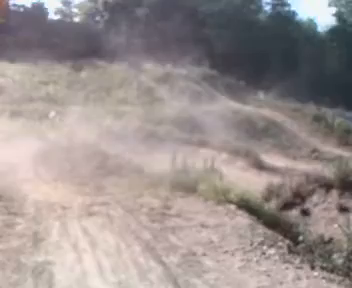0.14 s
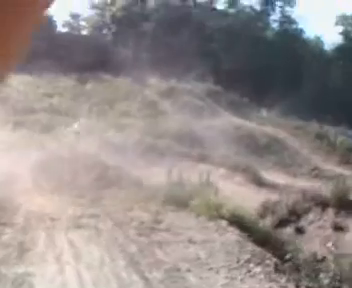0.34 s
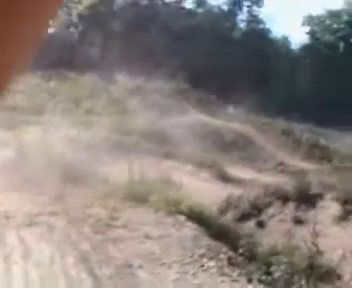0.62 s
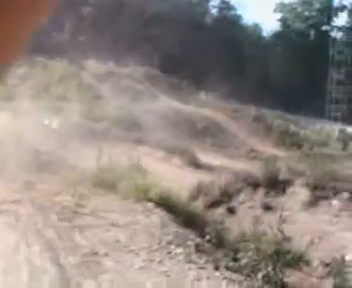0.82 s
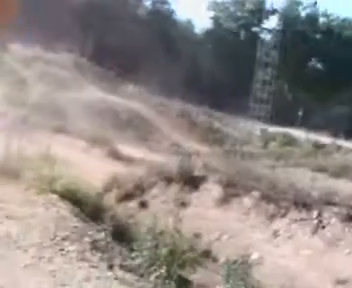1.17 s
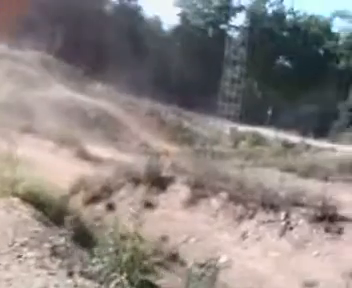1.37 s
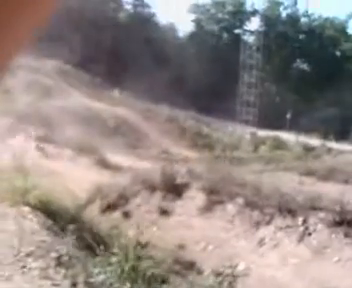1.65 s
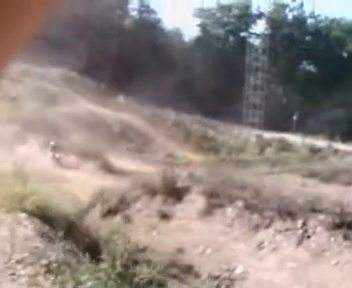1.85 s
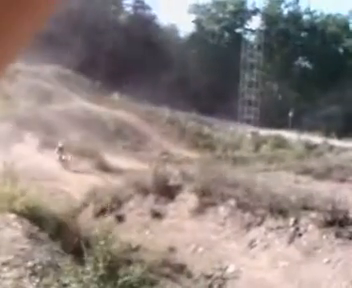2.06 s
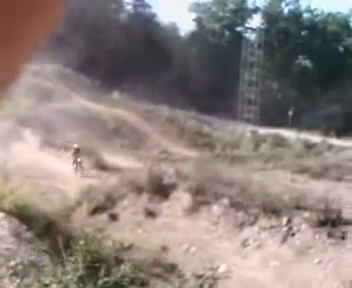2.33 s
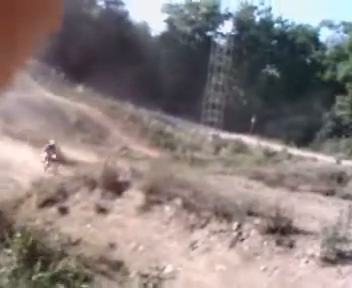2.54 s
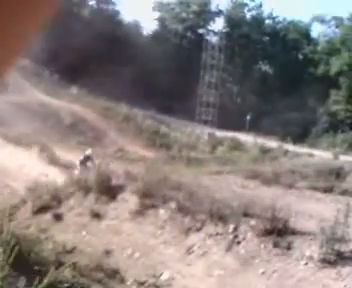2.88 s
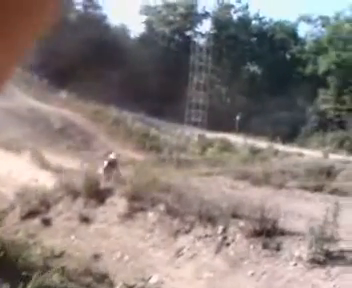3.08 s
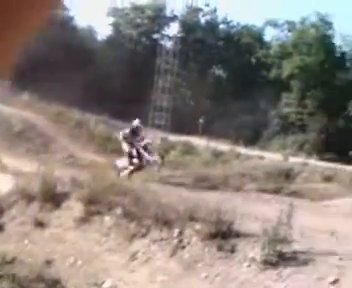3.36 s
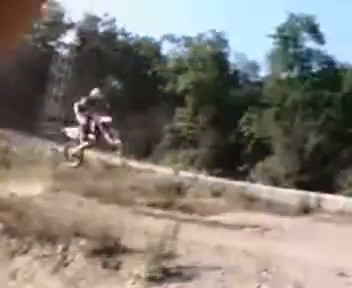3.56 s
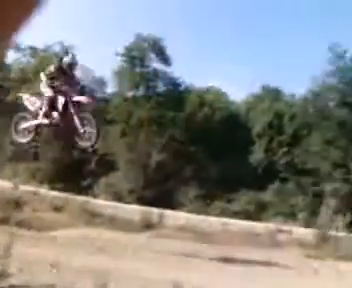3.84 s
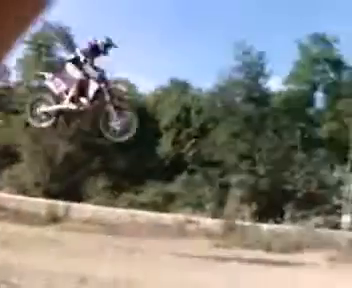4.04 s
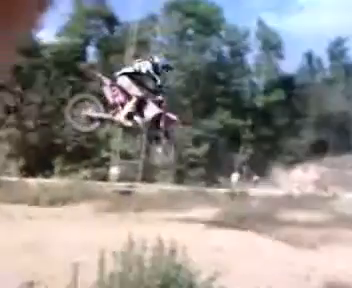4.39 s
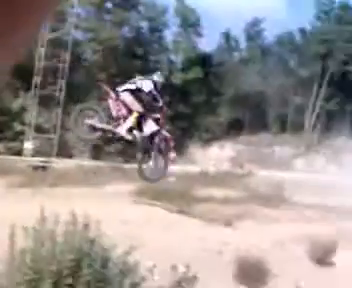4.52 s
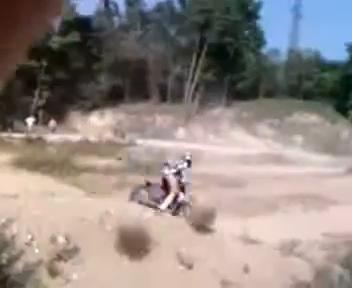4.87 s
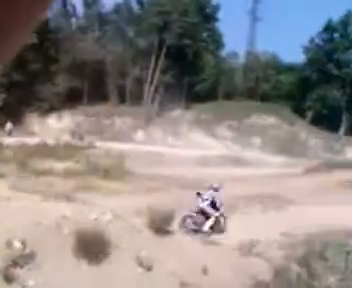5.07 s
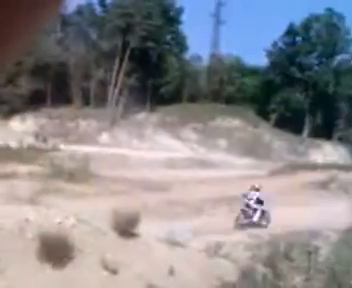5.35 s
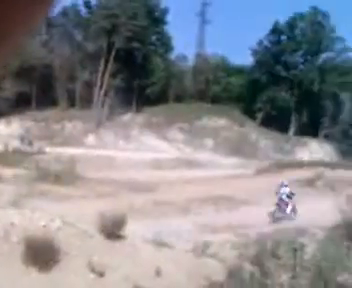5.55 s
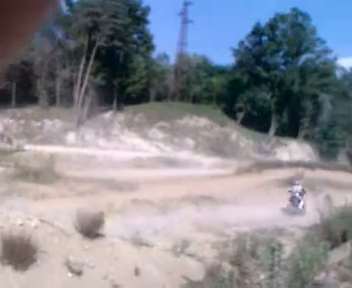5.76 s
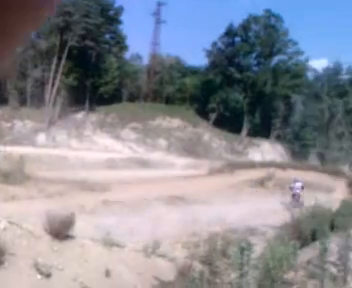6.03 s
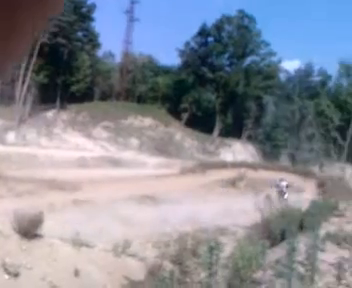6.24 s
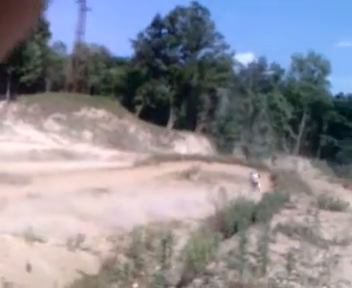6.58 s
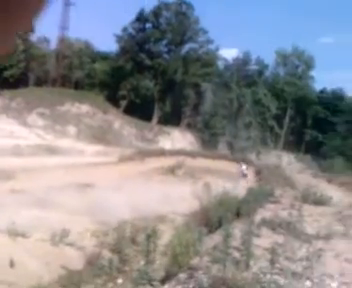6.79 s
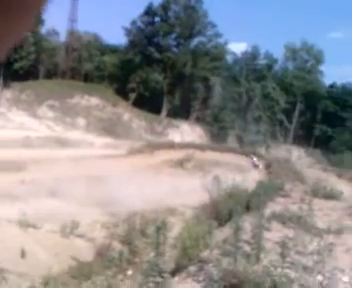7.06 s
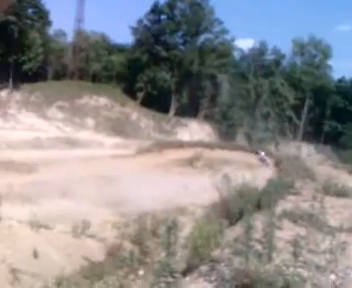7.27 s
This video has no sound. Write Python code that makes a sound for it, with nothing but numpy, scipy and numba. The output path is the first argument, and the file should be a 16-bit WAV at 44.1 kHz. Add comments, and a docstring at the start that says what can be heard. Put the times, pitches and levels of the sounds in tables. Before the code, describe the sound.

Outdoors in a dirt bowl, a harsh, buzzing two-stroke engine approaches in uneven throttle pulls, its pitch climbing steadily before cutting back. It is loudest mid-way, close and crackling, slightly overloading the cheap microphone, then screams briefly and rides off with fading pops and buzz. Faint hiss and low wind lie underneath; handling squeaks and dull knocks come from the recorder's plastic case.

```python
"""In a sandy bowl, a two-stroke dirt bike climbs, takes a jump near a small hand-held recorder and rides away.
Firings boom in the expansion chamber and bark from the silencer, gas and fins rasp; the banks echo it.
Clicks at the firing rate and gas noise pass through moving resonances; two sines carry the low boom.
The plastic case squeaks and knocks under the hand as ringing modes; noise makes the wind and far hiss.
The narrow-band recorder cuts the top of the treble and clips the peaks."""
import sys
import numpy as np
from scipy import signal
from scipy.fft import rfft, irfft, next_fast_len
from scipy.io import wavfile
from scipy.ndimage import uniform_filter1d
from numba import njit

SR = 44100
rng = np.random.default_rng(int(sys.argv[2]) if len(sys.argv) > 2 else 0)


def dump_mix(stems):
    """Bounce the given channels to the path in sys.argv[1] as a 16-bit WAV at rate SR."""
    frames = np.atleast_2d(stems).T  # one column per channel
    limited = np.clip(frames, -1, 1)  # hard clip at full scale
    pcm = np.round(limited * 32767).astype(np.int16)
    wavfile.write(sys.argv[1], SR, pcm)


def how_loud(loudness_db):
    """Turn decibels into a plain amplitude multiplier (0 dB gives 1, 20 dB gives 10)."""
    steps = np.asarray(loudness_db, float) / 20
    return 10 ** steps


N = 326781
T = np.arange(N) / SR


def level(x, db):
    """Scale to an rms level."""
    return x * how_loud(db) / np.sqrt(np.mean(x ** 2))


def curve(rows):
    """Columns of a table against time, one value a sample."""
    s, *columns = np.transpose(rows)
    return [np.interp(T, s, c) for c in columns]


def log_interp(hz, points):
    """Read a response of (Hz, dB) points along a logarithmic frequency axis."""
    point_hz, db = np.transpose(points)
    return np.interp(np.log(hz), np.log(point_hz), db)


def band(x, lo_hz, hi_hz, order=3):
    """Steep band-pass."""
    return signal.sosfilt(signal.butter(order, [lo_hz, hi_hz], "band", fs=SR, output="sos"), x)


def colour(x, points, sweep_ms=0.):
    """Impose a spectrum of (Hz, dB) points; each kHz may come sweep_ms later than the one below."""
    size = next_fast_len(N)
    f = np.maximum(np.arange(size // 2 + 1) * SR / size, 1)
    delay = np.exp(-1j * np.pi * sweep_ms * (f / 1000) ** 2)
    return irfft(rfft(x, size) * delay * how_loud(log_interp(f, points)), size)[:N]


def steady(x, hold_s):
    """Divide out the running rms, so that only the level curve sets the loudness."""
    return x / np.sqrt(uniform_filter1d(x ** 2, int(hold_s * SR)) + 1e-12)


def walk(rate):
    """Random levels held 1 / rate s and slewed twice; spread near 1."""
    k = int(SR / rate)
    held = np.repeat(rng.standard_normal(N // k + 1), k)
    return 1.3 * uniform_filter1d(uniform_filter1d(held, k), k)[:N]


def lag(x, tau_s):
    """Follow x with a time constant."""
    keep = np.exp(-1 / (tau_s * SR))
    return signal.lfilter([1 - keep], [1, -keep], x)


@njit
def svf(x, hz, width):
    """State-variable band-pass whose centre may move, gain 1 at the centre."""
    y, b, l = np.empty(len(x)), 0., 0.
    for i in range(len(x)):
        g, k = np.tan(np.pi * hz[i] / SR), width / hz[i]
        v = (b + g * (x[i] - l)) / (1 + g * (g + k))
        b, l, y[i] = 2 * v - b, l + 2 * g * v, k * v
    return y


def resonance(x, hz, width_hz):
    """Ring x at a fixed or moving frequency."""
    return svf(x, np.full(N, 1. * hz), 1. * width_hz)


def clicks(turns, size_db, late):
    """One click at each whole turn, shared between two samples; each has its own size and lateness (turns)."""
    whole = np.arange(1, int(turns[-1]))
    at = np.interp(whole + late[:len(whole)], turns, np.arange(N))
    before, size = at.astype(int), how_loud(size_db[:len(whole)])
    share = at - before
    return (np.bincount(before, size * (1 - share), N + 1) + np.bincount(before + 1, size * share, N + 1))[:N]


def crank():
    """Firing rate (Hz): the rear wheel skips over bumps and the revs flare; rough ground shakes them."""
    # crank speed without the wheelspin: t/s, firing rate f/Hz
    revs = [(0.0, 111.5), (0.331, 95.7), (0.348, 91.5), (0.453, 128.6), (0.493, 135.3), (0.737, 119),
            (0.906, 113.4), (1.004, 117.8), (1.12, 96.3), (1.207, 99.7), (1.3, 118.8), (1.44, 120.9),
            (1.49, 141.2), (1.54, 143.4), (1.625, 140.8), (1.73, 135.1), (1.869, 132.8), (1.968, 139.5),
            (2.101, 149.9), (2.194, 159.6), (2.368, 185), (2.548, 201), (2.79, 204.8), (2.868, 212.1),
            (2.914, 164.9), (2.949, 145.5), (3.036, 171.5), (3.106, 167.5), (3.239, 179.4), (3.338, 148.7),
            (3.518, 133.3), (3.698, 124), (3.762, 125.1), (3.905, 186.3), (4.005, 172.9), (4.296, 154.9),
            (4.574, 136.4), (4.743, 206.6), (4.83, 222.6), (4.905, 234), (4.925, 224.4), (4.957, 194.5),
            (4.985, 187.3), (5.143, 166.1), (5.24, 162.1), (5.37, 174), (5.451, 188.5), (5.492, 187.7),
            (5.666, 165.2), (5.764, 141.7), (5.968, 133.8), (6.101, 119.9), (6.16, 122), (6.287, 103.8),
            (6.374, 139.2), (6.502, 134.3), (6.687, 106.4), (6.978, 89), (7.338, 75), (7.407, 79.4)]
    # wheelspin flares: t/s of the peak, rise f/Hz
    slips = [(0.938, 7.9), (1.801, 10.7), (2.029, 11.8), (2.143, 10.6), (2.242, 6.4), (2.493, 15.5),
             (2.611, 21), (2.725, 27), (2.832, 6.85)]
    half_s, waver = .055, .0035  # half length of a flare (s), share of the revs
    flares = sum(hz * np.cos(np.pi / 2 * np.clip((T - s) / half_s, -1, 1)) ** 2 for s, hz in slips)
    return (curve(revs)[0] + flares) * (1 + waver * walk(30))


def throttle():
    """How far it is open (0-1), and what that adds to bark and boom (dB)."""
    # pulls: open t/s, shut t/s, bark gain/dB at first, at last, boom gain/dB at first, at last
    pulls = [(-0.1, 0.103, 0, 3.8, 15, 9), (0.35, 0.479, 2, 5.8, 12.5, 3.4),
             (0.951, 1.008, 5, 2.9, -5, 0.93), (1.117, 1.313, -4.5, 7.8, 3.5, 4.5),
             (1.426, 2.815, 7.5, 12.2, 12, 9.6), (2.777, 2.875, 4.5, 6.2, -2, 2.6),
             (2.953, 3.24, 8.5, 7.4, 3.5, 5.5), (3.766, 3.887, 12.5, 9.1, 4, 8.4),
             (4.591, 4.771, 13, 13.5, 6, 8.15), (4.754, 4.934, 9.5, 4.3, 3, 2.6),
             (4.934, 5.138, 9, 4.8, 7, 6.9), (5.137, 5.513, 5.5, 14.7, 8.5, 15.4),
             (6.094, 6.094, 9, 5.1, 6, 4.6), (6.305, 6.429, 3, 6.2, 6, 1.65)]
    open_s, shut_s, boom_open_s, boom_shut_s = 0.027, 0.035, 0.0017, 0.035
    opened, bark_db, boom_db = np.zeros((3, N))
    for start, end, bark_first, bark_last, boom_first, boom_last in pulls:
        ramp = lambda up_s, down_s: np.clip(np.minimum((T - start) / up_s, (end + down_s - T) / down_s), 0, 1)
        drift = lambda first, last: np.interp(T, [start + open_s, max(end, start + open_s)], [first, last])
        opened = np.maximum(opened, ramp(open_s, shut_s))
        bark_db = np.maximum(bark_db, ramp(open_s, shut_s) * drift(bark_first, bark_last))
        boom_db = np.maximum(boom_db, ramp(boom_open_s, boom_shut_s) * drift(boom_first, boom_last))
    # after a long pull the shut engine falls under its coasting level for a moment
    choke_db = -1 * (1 - opened) * lag(opened, 0.14) ** 2
    return opened, bark_db + choke_db, boom_db + choke_db


def banks(x, wet):
    """Ground and earth banks return the sound; the paths drift as the bike moves."""
    # echoes: mean delay t/ms, level/dB at wet = 1
    echoes = [(2.1, -7), (3.7, -6), (7.3, -6), (19, -11), (47, -16)]
    return x + wet * sum(how_loud(db) * np.interp(T - ms / 1000 * (1 + .12 * walk(1.5)), T, x) for ms, db in echoes)


def exhaust_pipe(firings, gas, rough):
    """Firings and gas noise, with their echoes, coloured by the exhaust and its standing waves."""
    # exhaust spectrum: f/Hz, level/dB per Hz
    spectrum = [(250, 20), (420, -1), (492, -13), (692, -3), (791, -6.5), (985, -2.5), (1130, -3),
                (1450, -1), (2310, -8), (2740, -11), (2980, -13.5), (4680, -22.5), (5410, -16.5),
                (6990, -12), (7700, -17), (10000, -79), (16900, -120)]
    # standing waves of the tail pipe: f/Hz, width f/Hz, level/dB
    waves = [(705, 80, 3), (1430, 110, -3), (2250, 200, -5)]
    puff = colour(gas, [(400, -5), (2500, 3)])  # turbulence blurs the high orders first
    hiss = level(band(gas, 3100, 9000, order=2), -5)
    wet = np.minimum(np.sqrt(rough / .14), 1)  # the clean close run drowns the echoes
    source = np.sqrt(1 - rough) * firings + np.sqrt(rough) * puff + hiss
    # each pulse leaves the silencer drawn out into a short rising sweep
    pipe = colour(banks(source, wet), spectrum, sweep_ms=2.2)
    return pipe + sum(how_loud(db) * resonance(pipe, hz, width) for hz, width, db in waves)


def low_orders(turns, first_db, second_db, patchy_db):
    """The two lowest orders of the firing rate stay clean; with the throttle shut they drop out in patches."""
    first_db = first_db + 1.6 * walk(18) - patchy_db * np.abs(walk(14))
    second_db = second_db + 2.2 * walk(18) - patchy_db * np.abs(walk(14))
    first = how_loud(first_db) * np.sin(2 * np.pi * turns - .4)
    second = how_loud(second_db) * np.sin(4 * np.pi * turns - .9)
    return np.sqrt(2) * (first + second)


def silencer_bark(pipe, bark_hz, snarl_db, upper_hz, upper_db):
    """Mid band of the pipe with its upper snarl mixed in, inverted; it rings at two moving centres."""
    bark = band(pipe, 1430, 3640) - how_loud(snarl_db) * band(pipe, 2560, 3963)
    bark = bark + how_loud(8.5) * resonance(bark, bark_hz, 600)
    return bark + how_loud(upper_db) * resonance(band(pipe, 1050, 4000), upper_hz, 260)


def expansion_chamber(pipe, chamber_hz, ring_db):
    """Low-mid band of the pipe with the chamber's moving ring."""
    chamber = band(pipe, 410, 1090)
    return chamber + how_loud(ring_db) * resonance(chamber, chamber_hz, 120)


def fin_rasp(pipe):
    """High band of gas and firings, in which the cooling fins ring on and off."""
    # fins: f/Hz, width f/Hz, level/dB before the wander
    fins = [(5500, 200, -15), (7150, 360, -13.5)]
    rasp = band(pipe, 3510, 6870)
    return rasp + sum(how_loud(db + 11.6 * walk(8)) * resonance(rasp, hz, width) for hz, width, db in fins)


def bare_crack(firings, bark_hz, upper_hz, upper_db):
    """Each firing arrives bare, and again off the ground; the crack rings at two moving centres side by side."""
    # crack spectrum: f/Hz, level/dB per Hz
    spectrum = [(250, -38), (420, -8.5), (680, 3.5), (1340, 0), (2050, -8.5), (3000, -7.5), (4850, -16.5),
                (7400, -13), (9000, -62)]
    ground_s = 3.3 / 1000 * (1 + 0.068 * walk(6))
    crack = -colour(firings + how_loud(-9.5) * np.interp(T - ground_s, T, firings), spectrum)
    bark_ring = how_loud(3.0) * resonance(crack, bark_hz, 220)
    upper_ring = how_loud(upper_db) * resonance(crack, upper_hz, 220)
    return crack + bark_ring + upper_ring


def bike():
    """Uneven firings drive the pipe and a puff of gas follows each; distance and throttle set the levels."""
    # distance and heading, throttle shut: t/s, bark level/dB, boom level/dB,
    # then added: second order level/dB, chamber level/dB, rasp level/dB
    ride = [(0.0, -27.5, -39.5, 0.5, -10.5, -5), (0.3, -34.5, -36, -11.5, -8, -10),
            (0.45, -28, -37.5, 1.5, -6.5, -9), (0.6, -29.5, -28, 1, -9, -10.5),
            (1.1, -29, -38.5, -2, -11, -8.5), (1.25, -29, -37, 2, -2, -8), (1.4, -30, -34.5, -2, -9, -10.5),
            (1.6, -29, -40.5, -4, -3, -4), (1.82, -25, -33, -8, -8, -8),
            (2.35, -25, -33.5, -9.5, -13, -4.5), (2.85, -27, -30, -8, -12.5, -2),
            (3.2, -31.5, -29.5, -7, -2.5, -12.5), (3.45, -25.5, -27, -10, -10.5, -3),
            (3.75, -24, -33.5, 7.5, -5.5, -7.5), (4.0, -21.5, -33.5, 3, -8, -3),
            (4.3, -21.5, -28, -16, -6, -5.5), (4.57, -25, -36, 10.5, -6, -7),
            (4.93, -29, -31, 6.5, 3.5, -5.5), (5.2, -35.5, -34, -5.5, 6, -3.5),
            (5.5, -32.5, -43, 1.5, -6, -12.5), (5.56, -35.5, -44.5, 7.5, -9, -4.5),
            (5.9, -45.5, -43, -8, -6, -6), (6.1, -49.5, -41.5, -2.5, -6.5, -3),
            (6.25, -54, -46, -9, -10, -2), (6.36, -48, -42.5, 1, -3.5, -7),
            (6.55, -50.5, -40, -3, -15.5, -2.5), (7.0, -67, -46, -29.5, -11, 4),
            (7.41, -62, -48, 1.5, -11, 3)]
    # where the tail pipe points: t/s, bark centre f/Hz, upper snarl level/dB,
    # chamber centre f/Hz, chamber ring level/dB, second ring f/Hz, second ring level/dB
    tone = [(0, 1960, 7.5, 860, -6, 2600, 6), (1.6, 1960, 6.5, 703, 13, 2620, 0),
            (2.0, 1890, 6, 770, 3.5, 2560, 0), (2.35, 2120, -5, 991, 12.5, 2360, 7),
            (2.7, 2130, -19, 1026, 2, 2450, 3), (3.25, 1678, 6, 920, 0, 2250, 6),
            (3.5, 1360, 8, 1012, 0, 1260, -2), (3.8, 1830, 8.5, 430, -2, 1380, 1),
            (4.2, 2110, 6.5, 736, -4.5, 1404, 8), (4.55, 2190, 7, 714, -13, 1380, 4.5),
            (4.68, 2090, 5, 714, -2.5, 2370, 15.5), (4.85, 1810, 9, 702, 12, 2380, -10),
            (5.0, 2390, 15, 800, 3, 3070, 8), (5.3, 2410, 6.5, 680, 7, 2990, -6),
            (5.5, 1491, 9, 720, -3, 2500, 4), (5.7, 1610, 18.5, 605, -2, 2310, 7),
            (6.35, 1625, 14.5, 578.7, 14, 2300, -1), (7.41, 2210, -6, 700, 1, 2999, -2)]
    # gas noise in the exhaust under steady load, high when far: t/s, roughness (0-1)
    roughness = [(0, .15), (1.5, .13), (2.35, .12), (2.6, .24), (2.9, .2), (3.1, .12), (4.2, .17),
                 (4.62, .08), (5.5, .07), (5.7, .18), (6.32, .02), (6.5, .05), (6.9, .6), (7.41, .65)]
    # low pipe response: f/Hz, level/dB
    low_pipe = [(80, -13.5), (115, -11.5), (135, -9), (170, 0), (220, 2.5), (260, -8), (350, -3.5),
                (460, -4)]
    # riding away, the tail pipe aims at the microphone: t/s, share of bare crack (0-1)
    aiming = [(4.7, 0), (4.8, .7), (4.97, .9), (5.5, .9), (5.58, 0), (6.28, 0), (6.33, .5), (6.6, 0)]
    revs = crank()
    turns = np.cumsum(revs) / SR
    opened, bark_gain_db, boom_gain_db = throttle()
    bark_db, boom_db, second_added_db, chamber_db, rasp_db = curve(ride)
    bark_db, boom_db = bark_db + bark_gain_db, boom_db + boom_gain_db
    boom_over_bark_db = boom_db - bark_db
    first_db = boom_over_bark_db + log_interp(revs, low_pipe)
    second_db = boom_over_bark_db + log_interp(2 * revs, low_pipe) + second_added_db
    bark_hz, snarl_db, chamber_hz, ring_db, upper_hz, upper_db = curve(tone)

    # as the throttle snaps open the chamber booms, and more noise follows
    snap_s = .05
    snap = np.maximum(opened - lag(opened, snap_s), 0)
    # the chamber follows the bark level by 0.72 and the boom by the rest
    chamber_db = chamber_db + (1 - 0.72) * boom_over_bark_db + 7 * snap
    rough = curve(roughness)[0] + .09 * (1 - opened) + .45 * lag(snap, snap_s)

    chance = rng.standard_normal((N // 100, 2)).T
    scatter_db = 4.5 * np.interp(np.arange(N // 100), turns, rough) * chance[0]
    firings = level(clicks(turns, scatter_db, .003 * chance[1]), 0)
    gas = level((9.3 + np.exp(-(turns % 1) / 0.13)) * rng.standard_normal(N), 0)
    pipe = exhaust_pipe(firings, gas, rough)

    low = low_orders(turns, first_db, second_db, 3.5 * (1 - opened))
    rumble = np.sqrt(rough) * level(band(gas, 130, 405, order=2), -14.5)
    bark = steady(silencer_bark(pipe, bark_hz, snarl_db, upper_hz, upper_db), 0.22)
    chamber = how_loud(chamber_db) * steady(expansion_chamber(pipe, chamber_hz, ring_db), 0.047)
    rasp = how_loud(rasp_db) * steady(fin_rasp(pipe), 0.039)
    crack = bare_crack(firings, bark_hz, upper_hz, upper_db)
    crack = how_loud(chamber_db - 0.5) * steady(crack, 0.05)
    aim = curve(aiming)[0]
    parts = np.sqrt(1 - 0.49 * aim) * bark + np.sqrt(1 - aim) * chamber + np.sqrt(aim) * crack + rasp
    return how_loud(bark_db) * (parts + low + rumble)


def air():
    """Far hiss of the open ground and low buffets of wind on the microphone."""
    # hiss spectrum: f/Hz, level/dB per Hz
    spectrum = [(18, -43), (30, -42), (87, -7.5), (266, 3), (433, -11.5), (705, -14), (3040, -8),
                (4840, -30), (7020, -43), (7700, -52.5), (10000, -80), (16900, -120)]
    # wind on the microphone: t/s, level/dB
    gusts = [(0.0, -50), (0.64, -59), (0.93, -35.5), (1.03, -50), (3.92, -55.5), (4.46, -72), (4.66, -46),
             (5.3, -71), (7.41, -74)]
    hiss = level(colour(rng.standard_normal(N), spectrum), -52.5) * how_loud(1.5 * walk(5))
    wind = level(band(rng.standard_normal(N), 28, 75, order=2) * how_loud(2.5 * walk(15)), 0)
    return hiss + how_loud(curve(gusts)[0]) * wind


def squeaks():
    """Fast stick-slip rings the case; strong and weak slips alternate, and the skin scratches."""
    # finger slipping on the case: start t/s, end t/s, slip rate f/Hz, push level/dB,
    # strong and weak slips plus and minus level/dB, scratch over the push level/dB
    finger = [(1.337, 1.348, 2160, -3, 0, -29), (1.346, 1.359, 2082, -14, 9.5, -4.5),
              (1.354, 1.373, 2170, -7.5, 2.5, -14.5), (1.375, 1.386, 2230, -27, 10.5, -3),
              (7.267, 7.28, 2170, -46, 8.5, 2), (7.289, 7.314, 2202, -60, 9, 11),
              (7.314, 7.328, 2102, -44, 6, 1), (7.327, 7.345, 2086, -50, 15.5, 10),
              (7.346, 7.37, 2130, -63, 16, 14)]
    # case modes, each filtered twice: f/Hz, filter width f/Hz, level/dB
    case = [(1080, 250, -3.5), (2170, 640, 1), (3140, 210, -2)]
    # scratch spectrum: f/Hz, level/dB per Hz
    spectrum = [(1500, -18), (3000, -8), (4500, -12), (5600, 3.5), (7600, -8.5)]
    push, rate, uneven_db, scratch = np.zeros(N), np.full(N, 2150.), np.zeros(N), np.zeros(N)
    for start, end, hz, db, alternate_db, scratch_db in finger:
        on = (T >= start) & (T < end)
        push[on], scratch[on] = how_loud(db), how_loud(db + scratch_db)
        rate[T >= start], uneven_db[T >= start] = hz, alternate_db
    turns = np.cumsum(rate) / SR
    chance = rng.standard_normal((N // 15, 2)).T
    slips = level(clicks(turns, 0.9 * chance[0], 0.07 * chance[1]), 5.1)
    slips = slips * how_loud(uneven_db * np.cos(np.pi * turns))
    slips = signal.lfilter([.05], [1, -.95], push) * slips
    ring = sum(how_loud(db) * resonance(resonance(slips, hz, width), hz, width) for hz, width, db in case)
    return ring + uniform_filter1d(scratch, size=200) * level(colour(rng.standard_normal(N), spectrum), 0)


def bumps():
    """The hand shifts on the case: dull short knocks, each a sum of decaying modes."""
    # knocks: t/s, peak level/dB
    knocks = [(6.87, -44), (6.918, -40), (6.96, -47), (7.18, -46), (7.352, -42), (7.378, -38), (7.391, -47)]
    # modes of the case: f/Hz, level/dB, decay by 60 dB t/s
    modes = [(119.4, -6, 0.044), (251, -3, 0.019), (755, -4.5, 0.022)]
    age = lambda s: np.clip(T - s, 0, 1)
    return sum(how_loud(db + mode_db - 60 * age(s) / t60) * np.sin(2 * np.pi * hz * age(s))
               for s, db in knocks for hz, mode_db, t60 in modes)


def scene():
    """Bike, case and air at one microphone."""
    return (bike() + squeaks() + bumps() + air())[None]


def band_limit(x):
    """A steep low-pass at the top of the band."""
    return signal.sosfilt(signal.butter(12, 15870, fs=SR, output="sos"), x)


def record(dry):
    """Coarse sampling cuts the top and leaves a faint mirror above it; the loudest peaks clip."""
    top_hz, grid_hz = 7690, 16000  # low-pass edge, coarse sampling rate
    x = signal.sosfilt(signal.ellip(12, .3, 75, top_hz, fs=SR, output="sos"), dry)
    mirror = band(x * np.cos(2 * np.pi * grid_hz * T), 8360, 8697, order=4)
    mix = np.clip(x + how_loud(-9.5) * mirror, -.74, .74)
    return band_limit(mix)


dry = scene()
out = record(dry)
dump_mix(out)
```